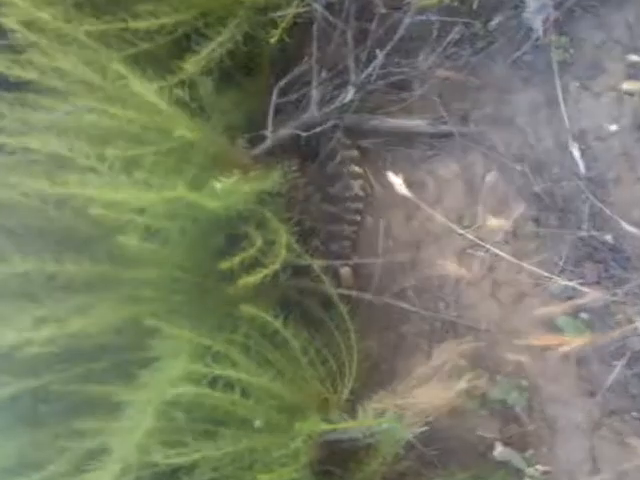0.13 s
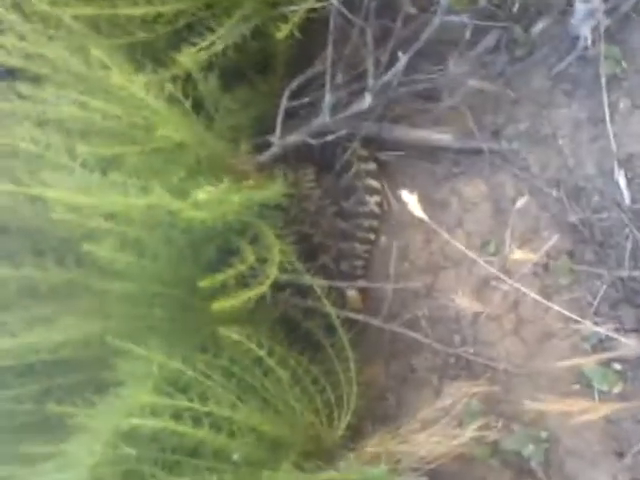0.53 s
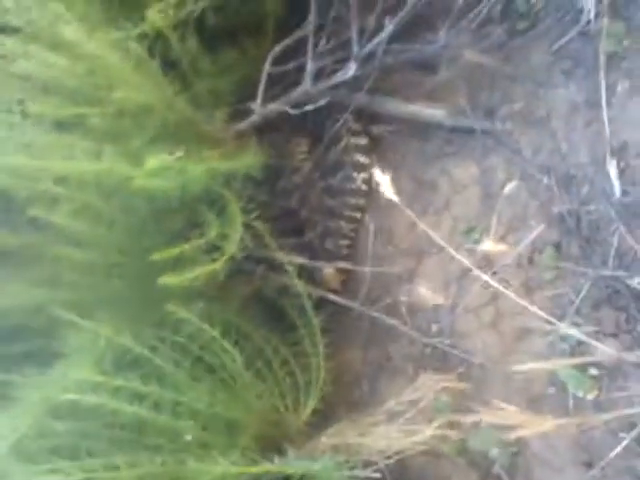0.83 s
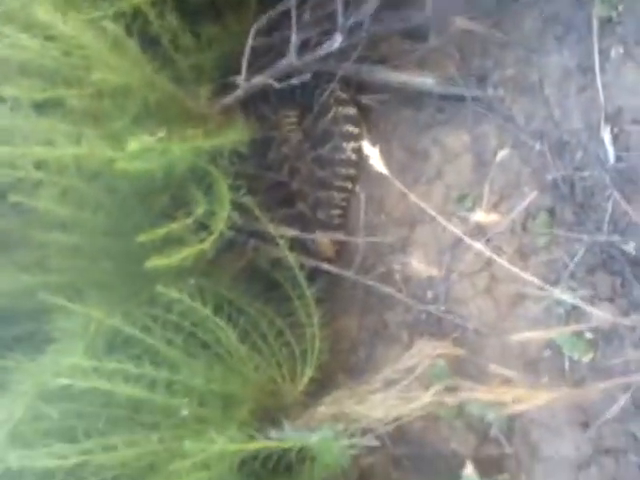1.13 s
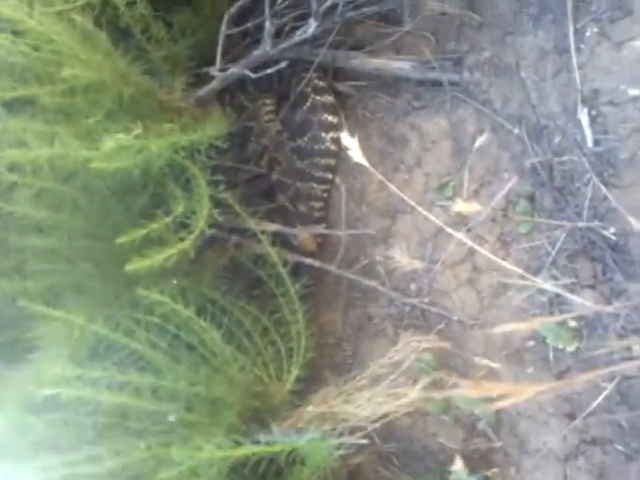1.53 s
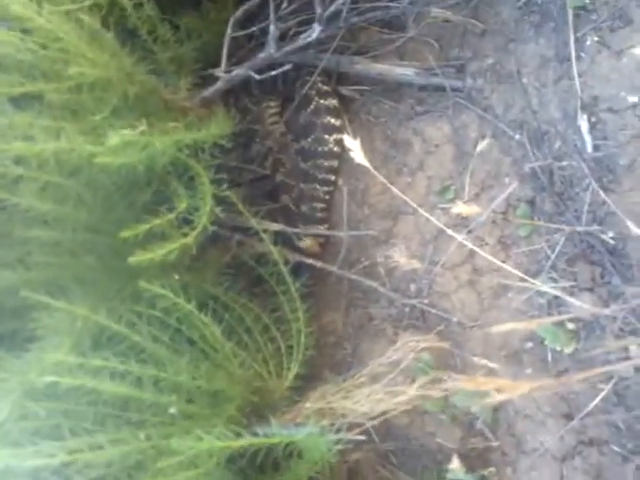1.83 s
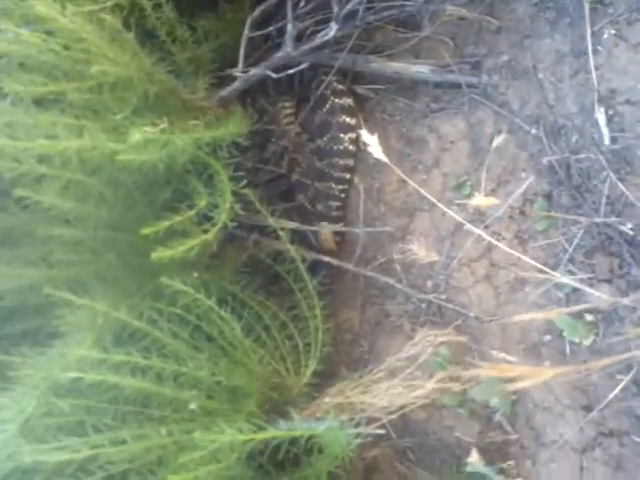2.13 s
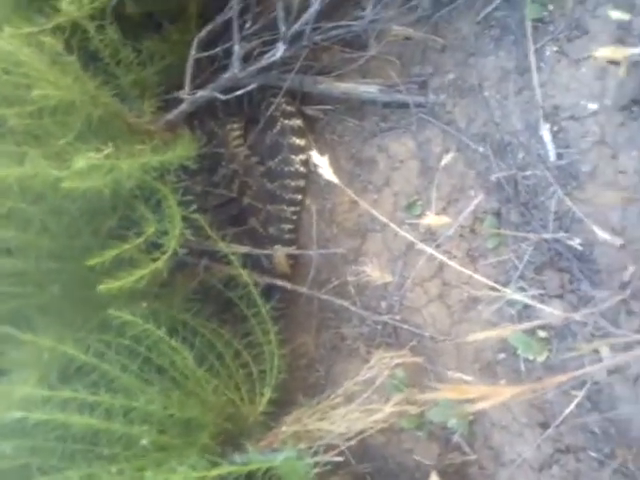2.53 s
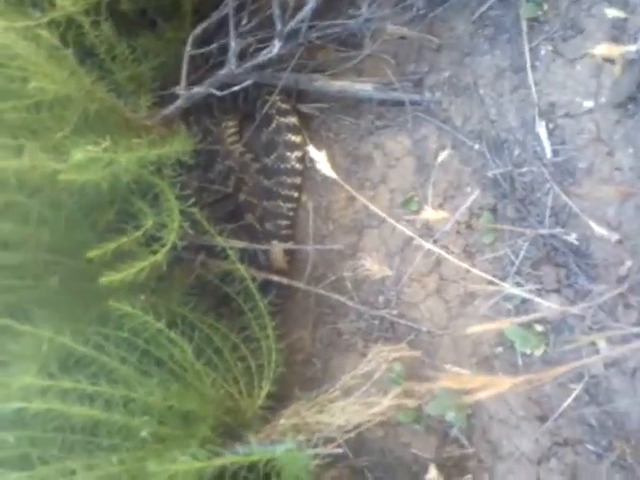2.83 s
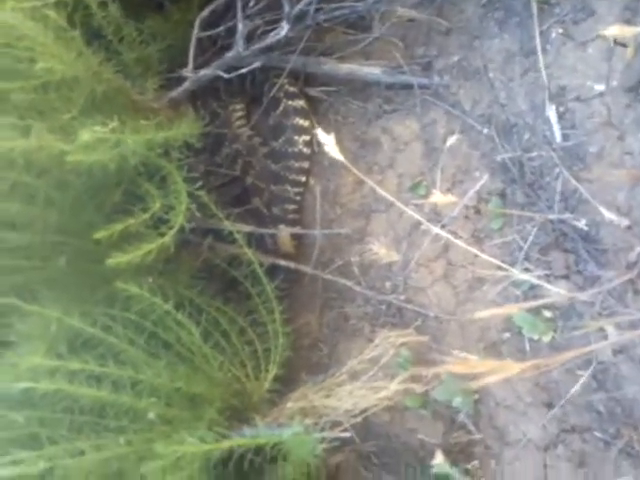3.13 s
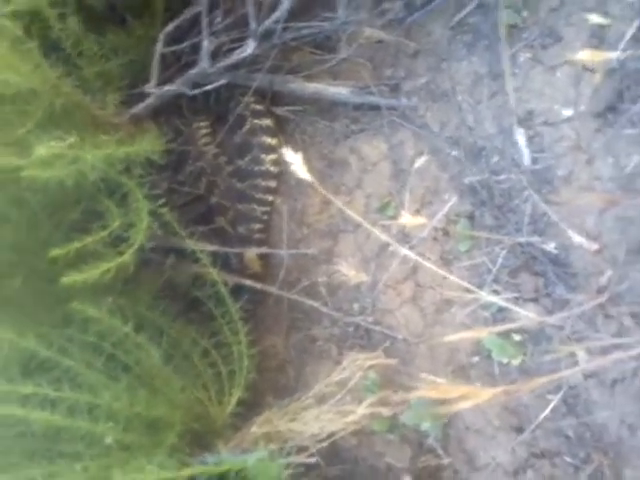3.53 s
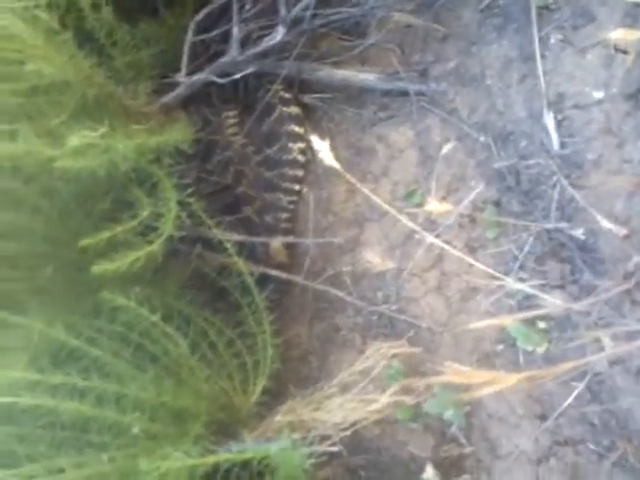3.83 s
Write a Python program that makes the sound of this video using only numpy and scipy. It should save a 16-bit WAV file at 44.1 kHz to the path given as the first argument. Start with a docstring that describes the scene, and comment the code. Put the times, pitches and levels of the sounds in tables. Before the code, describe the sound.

A rattlesnake buzzes loudly and close for about a second and a half, breaks into short dry flicks, then falls quiet; a small bump, faint outdoor air, another brief rattle and distant birds follow.

```python
"""Under a bush on dry ground, a rattlesnake buzzes its tail, then stops in a few separate flicks.
Each stroke knocks the hollow segments together: random clicks bunched at every turn of the tail and ringing.
Shaped noise makes the stirred litter, close scuffs, ticking twigs and quiet outdoor air; a bump rings in modes.
Small birds far off are gliding sines: whistles, warbling trills and rasps."""
import sys
import numpy as np
from scipy import signal
from scipy.fft import rfft, irfft, next_fast_len
from scipy.io import wavfile
from scipy.ndimage import uniform_filter1d

SR = 44100
rng = np.random.default_rng(int(sys.argv[2]) if len(sys.argv) > 2 else 0)


def pcm_store(signal):
    """Save signal as 16-bit PCM."""
    levels = np.round(np.clip(np.atleast_2d(signal), -1, 1) * 32767)
    wavfile.write(sys.argv[1], SR, levels.astype(np.int16).T)


N = 176400
TIME = np.arange(N) / SR
SIZE = next_fast_len(N + SR // 2)  # room for filter tails
FREQS = np.arange(SIZE // 2 + 1) * SR / SIZE

# Colour of the outdoor air. Each row: frequency in Hz, relative level in dB.
AIR_COLOUR = [(25, -50), (60, -12), (110, 5), (400, 1.5), (800, -7), (1500, -10.5), (3400, -11.5),
              (4300, -9.5), (5000, -13), (6000, -10), (8000, -12.5), (10000, -15.5), (15500, -16.5)]
# Slow swell of the air. Each row: time in seconds, level in dB.
AIR_LEVEL = [(0, -59.5), (2.0, -57), (2.3, -58), (2.7, -59.5), (2.9, -62), (3.4, -58.5), (4, -59)]
AIR_APART_DB = -11  # each side's own hiss against the shared hiss

# A bird's arched whistles. Each row: start in seconds, length in seconds, top pitch in Hz, level in dB.
WHISTLES = [(2.793, 0.069, 4324, -54.5), (3.237, 0.067, 4210, -51.5), (3.601, 0.069, 4140, -53.5)]
WHISTLE_RISE_HZ, WHISTLE_RISE_S, WHISTLE_SAG_HZ = 920, 0.00747, 100
# Quick falling chip at the end of each whistle
CHIP_S, CHIP_FROM_HZ, CHIP_TO_HZ, CHIP_DB = 0.0064, 6700, 5000, -59
# Farther warbling trills. Each row: start in seconds, length in seconds, notes per second,
# middle pitch in Hz, swing either way in Hz, level in dB.
TRILLS = [(2.936, 0.15, 32, 5900, 282, -69.5), (3.157, 0.11, 52, 5860, 302, -66)]
# A bird's rasps. Each row: start in seconds, length in seconds, sweeps per second,
# sweep start in Hz and sweep end in Hz (both before the sag), level in dB.
RASPS = [(3.856, 0.1, 138, 3940, 6160, -53.5), (3.904, 0.11, 132, 3700, 5900, -59.5)]
RASP_SAG_HZ_PER_S = 2000
RASP_JITTER, SWEEP_PERIODS = .08, 1.8  # timing spread and sweep length, both in sweep periods
BIRD_ECHO_S, BIRD_ECHO_DB = 0.067, -7.5

# Colour of the dull litter stirred under the tail. Each row: frequency in Hz, relative level in dB.
STIR_COLOUR = [(40, -27), (110, -1), (200, 3.5), (450, -7.5), (750, -13.5), (1600, -12.5), (2400, -40.5)]
STIR_DB = -31.5  # against the buzz

# Scuffs near the microphone. Each row: start in seconds, length in seconds, level in dB.
SCUFFS = [(0.503, 0.03, -48), (0.556, 0.034, -47), (0.623, 0.016, -41.5), (0.74, 0.037, -50),
          (0.866, 0.086, -51), (1.921, 0.018, -48.5), (1.944, 0.033, -50), (1.992, 0.0089, -36.5),
          (2.005, 0.011, -28.5), (2.028, 0.017, -55.5)]
# Colour of the scuffs. Each row: frequency in Hz, relative level in dB.
SCUFF_COLOUR = [(40, -39), (120, -4), (250, -1.5), (470, -4.5), (600, -9), (760, -6), (1050, -8.5),
                (1350, -12.5), (1780, -2.5), (2200, -5), (3800, -11.5), (5500, -10.5), (8500, -15.5),
                (15500, -17.5)]
SCUFF_EDGE_S = 0.0015

# Hollow modes of a bump. Each row: frequency in Hz, level in dB, decay in seconds.
BUMP_MODES = [(188, -55, 0.0079), (302, -54, .008), (470, -48, 0.0097), (713, -43, 0.0083),
              (905, -23.5, 0.0027), (1203, -32, 0.0026), (1345, -35, 0.0032), (1887, -36, 0.0031)]
BUMP_S, BUMP_ATTACK_S = 2.011, 0.004

# Twigs ticking. Each row: time in seconds, low knock in dB before its boost, snap in dB before its boost. The
# last row is not a twig: it sounds together with the falling chip that ends the third whistle.
TICKS = [(0.03, -45, -70), (0.379, -75, -53.5), (.505, -58.5, -56), (.571, -67, -54), (0.624, -47.5, -47.5),
         (0.723, -47.5, -59), (0.779, -64, -51), (.833, -68, -52), (.909, -71, -49), (1.809, -55, -48),
         (3.189, -52, -60), (3.502, -79, -59.5), (3.673, -62, -66)]
# Colour of a twig's low knock. Each row: frequency in Hz, relative level in dB.
KNOCK_COLOUR = [(100, -9), (300, 2.5), (470, 11.5), (700, -2.5), (1500, -36), (8000, -58)]
# Colour of a twig's snap. Each row: frequency in Hz, relative level in dB.
SNAP_COLOUR = [(300, -19), (900, -1), (1700, 4), (2600, 1), (7000, -9.5), (15000, -13)]
KNOCK_DECAY_S, KNOCK_BOOST_DB = 0.0051, 6
SNAP_DECAY_S, SNAP_BOOST_DB = 0.0061, 9

# Vigour of the sustained buzz, up to its end. Each row: time in seconds, level in dB.
BUZZ_LEVEL = [(0, -25), (.17, -25), (.35, -23), (.40, -24.5), (.8, -24.5), (1.3, -25.5), (1.37, -24),
              (1.415, -28.5), (1.44, -26.5)]
# Pace and force of the tail. Each row: time in seconds, mean turns per second,
# mean dB by which a turn stands out before levelling.
STROKES = [(0, 152, 7), (.45, 160, 7), (.8, 183, 5), (1.15, 175, 4), (1.4, 165, 4.5), (1.8, 180, 5),
           (3.4, 215, 8)]
STROKE_JITTER, STROKE_SPREAD = .4 * .4, .6  # relative unevenness of pace (RMS) and of force (either way)
TURN_SHARE = .4  # width of the clatter, as a share of a stroke
KNOCKS_PER_S, KNOCK_SPREAD_DB = 10000, 1.0
KNOCK_APART_DB = -21.5  # each side's own knocks against the shared ones
# Single flicks, after which loose segments settle. Each row: start in seconds, length in seconds,
# level in dB before the trim, settling length in seconds, settling level in dB before the trim.
FLICKS = [(1.425, 0.02, -30, 0.028, -30), (1.517, 0.027, -27, 0.037, -43.5),
          (1.593, 0.016, -24.5, 0.03, -36), (1.683, 0.014, -24, 0.019, -37),
          (1.749, 0.01, -21.5, 0.019, -35), (1.823, 0.019, -25.5, 0.026, -32.5),
          (3.366, 0.016, -24.5, 0.005, -38), (3.393, 0.0098, -31.5, 0.012, -46),
          (3.464, 0.024, -42, .004, -54)]
FLICK_ATTACK_S, FLICK_RELEASE_S, FLICK_TRIM_DB = 0.0014, 0.0037, -3
# Single hard knocks of a segment. Each row: time in seconds, level in dB.
STRAYS = [(.302, -16), (1.099, -16.5), (1.305, -22), (1.352, -18), (1.427, -20.5), (1.493, -38),
          (1.503, -44), (1.565, -44), (1.573, -33), (1.587, -34), (1.677, -31), (1.687, -19.5),
          (1.723, -26), (1.783, -41), (1.789, -43), (1.799, -35), (1.806, -40), (2.228, -44), (3.364, -37),
          (3.381, -22.5), (3.456, -45), (3.478, -34), (3.484, -47)]
STRAY_ATTACK_S, STRAY_DECAY_S = 0.00056, 0.0021
# Dry click of the segments. Each row: frequency in Hz, relative level in dB.
SHELL_COLOUR = [(700, -33), (1700, -33), (2400, -88), (2850, -4), (3500, -14.5), (3870, -28), (4130, -7.5),
                (4450, -0.5), (5100, -4), (5650, 0), (6600, 1), (7500, 4), (8500, -4), (9900, -9),
                (11200, -5), (13500, -6.5), (15600, -10)]
# Hollow segments ringing in the buzz. Each row: frequency in Hz, width in Hz, level against the buzz in dB.
CAVITIES = [(6862, 180, -5.5), (7260, 110, -10.5)]
# The rattle's place between the microphones. Each row: frequency in Hz, left minus right in dB.
RATTLE_PAN = [(2800, 1), (3400, 6), (3850, -9), (4350, 23.5), (5100, -7.5), (5700, 13.5), (6500, -0.5)]
SCATTER_S, SCATTER_DB = 0.0054, -16.5  # diffuse reflections around the rattle

# Phase of the right microphone against the left. Each row: frequency in Hz, phase in cycles.
MIC_PHASE = [(0, -.5), (450, -.32), (900, -.02), (1650, .02), (2200, .48), (3000, .5), (3750, .02),
             (4500, -.02), (5200, -.5), (15600, -4.5)]
CUTOFF_HZ = 15750


def from_db(db):
    """Turn decibels into gain."""
    return 10 ** (np.asarray(db) / 20)


def rms_one(x):
    """Scale to unit power."""
    return x / np.sqrt(np.mean(np.abs(x) ** 2) + 1e-20)


def in_time(rows):
    """Draw a curve through the rows at every sample."""
    return np.interp(TIME, *np.transpose(rows))


def at_hz(points):
    """Spread a spectrum table over all frequencies, on a log frequency scale."""
    hz, value = np.transpose(points)
    return np.interp(np.log(FREQS + 1), np.log(hz), value)


def filtered(x, response):
    """Apply a frequency response."""
    return irfft(rfft(x, SIZE) * response, SIZE)[..., :N]


def colour(x, points):
    """Colour with a causal filter of the given spectrum; white input keeps its power."""
    cepstrum = irfft(np.log(from_db(at_hz(points))), SIZE)
    # Doubling the first half of the cepstrum leaves no sound ahead of its cause
    response = np.exp(rfft(2 * cepstrum[:SIZE // 2], SIZE))
    return filtered(x, rms_one(response))


def resonate(x, hz, width_hz):
    """Ring one two-pole resonance, at unit power."""
    radius = np.exp(-np.pi * width_hz / SR)
    feedback = [1, -2 * radius * np.cos(2 * np.pi * hz / SR), radius * radius]
    return rms_one(signal.lfilter([1, 0, -1], feedback, x))


def burst(start, length, attack, release):
    """Envelope that rises exponentially up to its start, holds, then falls exponentially."""
    rise = np.minimum((TIME - start) / attack, 0)
    fall = np.maximum((TIME - start - length) / release, 0)
    return np.exp(np.maximum(rise - fall, -40))


def grains(per_s, spread_db):
    """Random clicks of uneven size and either sign, at unit power."""
    size_db = spread_db * np.minimum(rng.exponential(1, N), 4)
    sizes = from_db(size_db) * rng.choice([-1, 1], N)
    return rms_one(sizes * (rng.random(N) < per_s / SR))


def scattered(x, decay_s, db):
    """Add diffuse reflections, a decaying noise tail different on each side."""
    tail = rng.standard_normal((2, SR // 2)) * np.exp(-TIME[:SR // 2] / decay_s)
    return x + from_db(db) * filtered(x, rms_one(rfft(tail, SIZE)))


def air():
    """Soft outdoor hiss: coloured noise, mostly shared by both sides."""
    white = rng.standard_normal(N) + from_db(AIR_APART_DB) * rng.standard_normal((2, N))
    return from_db(in_time(AIR_LEVEL)) * colour(white, AIR_COLOUR)


def note(start, length, hz):
    """A sine on a pitch curve that swells and fades."""
    swell = np.sqrt(2) * np.sin(np.pi * np.clip((TIME - start) / length, 0, 1))
    return swell * np.sin(2 * np.pi * np.cumsum(hz) / SR)


def whistle(start, length, top_hz):
    """The pitch slides up fast towards its top, then sags at the end."""
    age = np.clip(TIME - start, 0, length)
    rise = WHISTLE_RISE_HZ * np.exp(-age / WHISTLE_RISE_S)
    sag = WHISTLE_SAG_HZ * (age / length) ** 4
    return note(start, length, top_hz - rise - sag)


def chip(start):
    """A tiny note falling straight in pitch."""
    return note(start, CHIP_S, np.interp(TIME, [start, start + CHIP_S], [CHIP_FROM_HZ, CHIP_TO_HZ]))


def trill(start, length, rate, hz, swing):
    """Pitch and loudness warble together, softest where the pitch is highest."""
    warble = np.cos(2 * np.pi * rate * (TIME - start))
    return (1 - .5 * warble) * note(start, length, hz + swing * warble)


def rasp(start, length, rate, low, high):
    """Overlapping upward sweeps, uneven in time and strength, sinking in pitch."""
    out, count = np.zeros(N + SR), int(length * rate)
    along = np.linspace(0, 1, int(SWEEP_PERIODS / rate * SR), endpoint=False)
    for k, (late, strength, phase) in enumerate(rng.standard_normal((40, 3))[:count]):
        age = (k + RASP_JITTER * late) / rate
        hz = low + (high - low) * along - RASP_SAG_HZ_PER_S * age
        swell = np.sin(np.pi * (k + .5) / count)  # over the whole rasp
        gain = from_db(2 * strength) * swell * np.sin(np.pi * along) ** .25
        first = int((start + age) * SR)
        out[first:first + len(along)] += gain * np.sin(2 * np.pi * (np.cumsum(hz) / SR + phase))
    return out[:N]


def birds():
    """Far whistles with their chips, trills and rasps, all in a diffuse echo."""
    out = np.zeros(N)
    for start, length, top_hz, db in WHISTLES:
        out += from_db(db) * whistle(start, length, top_hz)
        out += from_db(CHIP_DB) * chip(start + length - CHIP_S / 2)
    for *shape, db in TRILLS:
        out += from_db(db) * trill(*shape)
    for *shape, db in RASPS:
        out += from_db(db) * rasp(*shape)
    return scattered(out, BIRD_ECHO_S, BIRD_ECHO_DB)


def buzz_gain():
    """The sustained shaking, silent once it has ended."""
    return from_db(in_time(BUZZ_LEVEL)) * (TIME < BUZZ_LEVEL[-1][0])


def stirred_litter():
    """Dull noise that follows the vigour of the buzz."""
    return from_db(STIR_DB) * colour(buzz_gain() * rng.standard_normal(N), STIR_COLOUR)


def scuffs():
    """Gritty rubbing: coloured clicks let through by short bursts of pressure."""
    pressure = sum(from_db(db) * burst(start, length, SCUFF_EDGE_S, SCUFF_EDGE_S)
                   for start, length, db in SCUFFS)
    return colour(pressure * grains(per_s=6000, spread_db=5.0), SCUFF_COLOUR)


def bump():
    """A few short modes that swell and die."""
    out = np.zeros(N)
    for hz, db, decay in BUMP_MODES:
        ring = np.sin(2 * np.pi * (hz * TIME + rng.random()))
        out += from_db(db) * burst(BUMP_S, 0, BUMP_ATTACK_S, decay) * ring
    return out


def twigs():
    """Each tick mixes a low knock and a bright snap, both dying bursts of coloured noise."""
    knocks = sum(from_db(db + KNOCK_BOOST_DB) * burst(s, 0, 1 / SR, KNOCK_DECAY_S) for s, db, _ in TICKS)
    snaps = sum(from_db(db + SNAP_BOOST_DB) * burst(s, 0, 1 / SR, SNAP_DECAY_S) for s, _, db in TICKS)
    low = colour(knocks * rng.standard_normal(N), KNOCK_COLOUR)
    return low + colour(snaps * rng.standard_normal(N), SNAP_COLOUR)


def ground():
    """Litter, scuffs, bump and twigs with short diffuse reflections."""
    return scattered(stirred_litter() + scuffs() + bump() + twigs(), decay_s=0.005, db=-16.0)


def strokes():
    """Each turn of the tail throws the segments together at once; the clatter then thins."""
    wander = rms_one(uniform_filter1d(rng.standard_normal(N), size=441))  # over 10 ms
    table = np.array(STROKES)
    speed, depth_db = in_time(table[:, [0, 1]]), in_time(table[:, [0, 2]])
    turns = np.cumsum(speed * (1 + STROKE_JITTER * wander)) / SR
    force = 1 + STROKE_SPREAD * rng.uniform(-1, 1, N)[turns.astype(int)]  # one draw per turn
    clatter = np.exp(-(turns % 1 / TURN_SHARE) ** 2)
    gain = from_db(depth_db * force * clatter)
    return gain / np.sqrt(uniform_filter1d(gain ** 2, size=2205))  # level power over 50 ms


def segment_knocks():
    """Dense clicks bunched by the strokes, mostly shared by both sides."""
    shared, left, right = (grains(KNOCKS_PER_S, KNOCK_SPREAD_DB) for _ in range(3))
    return strokes() * rms_one(shared + from_db(KNOCK_APART_DB) * np.array([left, right]))


def flick_gain():
    """Each flick rises fast and hands over to the settling of loose segments."""
    out = np.zeros(N)
    for start, length, db, settle, settle_db in FLICKS:
        flick = from_db(db) * burst(start, length, FLICK_ATTACK_S, FLICK_RELEASE_S)
        settling = from_db(settle_db) * burst(start + length, settle, FLICK_ATTACK_S, FLICK_RELEASE_S)
        out += np.maximum(flick, settling)
    return from_db(FLICK_TRIM_DB) * out


def stray_knocks():
    """Single hard knocks as very short bursts of noise."""
    gain = sum(from_db(db) * burst(s, 0, STRAY_ATTACK_S, STRAY_DECAY_S) for s, db in STRAYS)
    return gain * rng.standard_normal(N)


def cavity_rings(knocks):
    """The knocks, with random signs, set the hollow segments ringing."""
    return sum(from_db(db) * resonate(knocks * rng.choice([-1, 1], N), hz, width)
               for hz, width, db in CAVITIES)


def rattle():
    """Shell-coloured knocks in buzz and flicks, with cavities ringing through the buzz."""
    knocks, buzz = segment_knocks(), buzz_gain()
    clicks = colour(knocks * (buzz + flick_gain()) + stray_knocks(), SHELL_COLOUR)
    sound = clicks + cavity_rings(knocks) * buzz
    sides = from_db(at_hz(RATTLE_PAN) * np.array([[.5], [-.5]]))
    sides = sides / np.sqrt(np.mean(sides ** 2, axis=0))  # panning keeps the power
    return filtered(scattered(sound, SCATTER_S, SCATTER_DB), sides)


def scene():
    """Air, birds, ground and snake together."""
    return air() + birds() + ground() + rattle()


def record(dry):
    """The microphone pair shifts the phase between the sides; the top is cut steeply."""
    phase = np.interp(FREQS, *np.transpose(MIC_PHASE))
    low_pass = 1 / np.sqrt(1 + (FREQS / CUTOFF_HZ) ** 600)
    # Half the shift goes to each side, in opposite directions
    shift = np.exp(1j * np.pi * phase * np.array([[-1], [1]]))
    return filtered(dry, low_pass * shift)


dry = scene()
out = record(dry)
pcm_store(out)
```